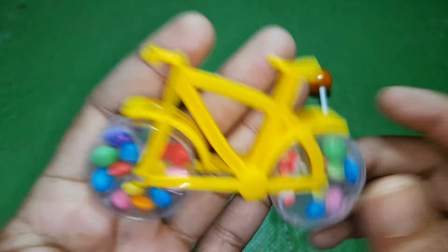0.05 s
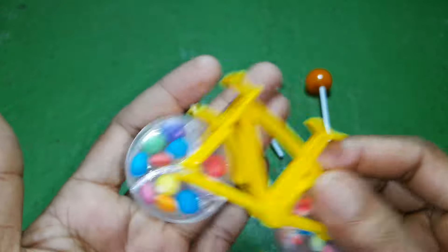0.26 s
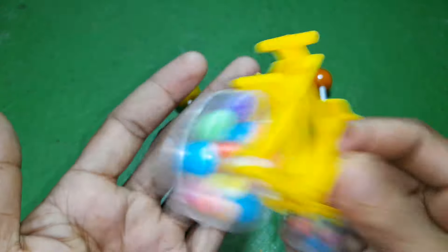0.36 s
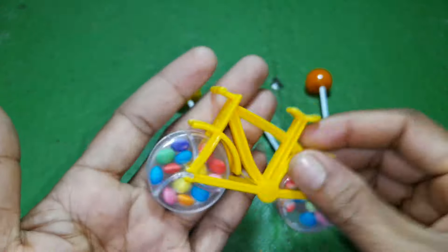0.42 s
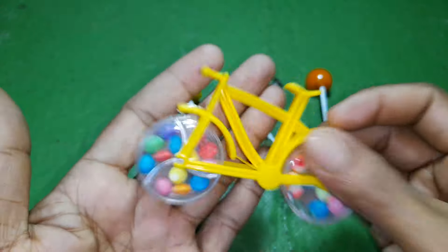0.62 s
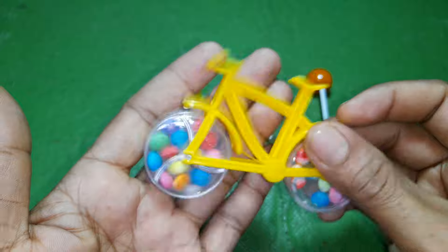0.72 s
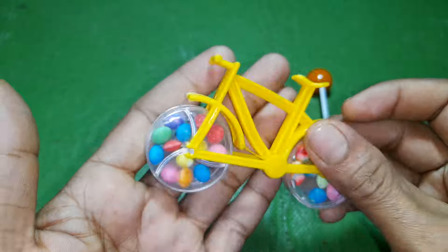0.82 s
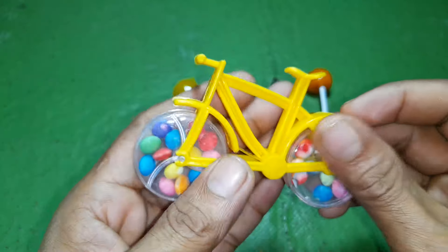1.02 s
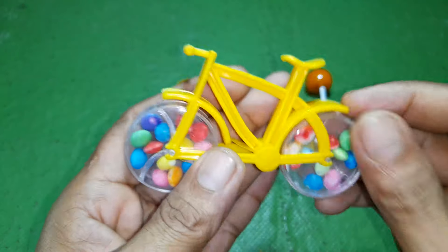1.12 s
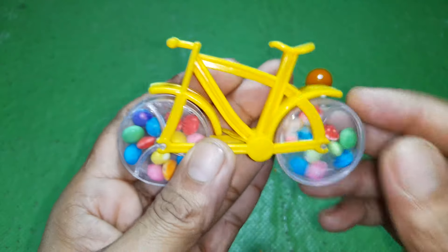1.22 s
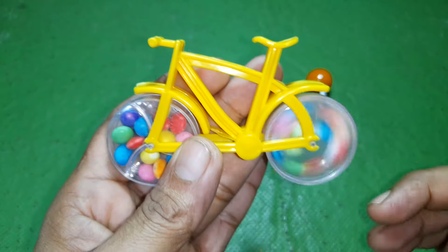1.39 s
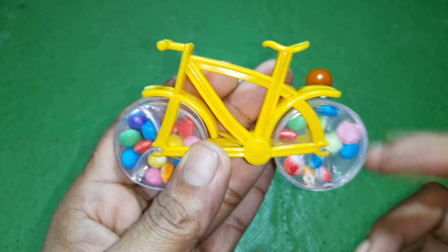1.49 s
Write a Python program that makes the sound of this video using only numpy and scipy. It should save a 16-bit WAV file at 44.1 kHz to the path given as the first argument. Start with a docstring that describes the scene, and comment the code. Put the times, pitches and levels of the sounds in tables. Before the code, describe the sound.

Hard candies rattle in a toy's plastic wheels in quick bursts of bright clicks.

```python
"""Bursts of bright clicks: hard candies rattle in the plastic wheels of a toy bicycle, shaken close by.
Each shake throws the candies against the wheel wall and each other, and they tumble back.
The wheel knocks and the candies ping. Two hard shakes thump the left microphone, and at the end
a finger flicks a wheel. The small room adds a short echo, and a low hum lies underneath."""
import sys
import numpy as np
from scipy import signal
from scipy.fft import rfft, irfft
from scipy.io import wavfile
from scipy.ndimage import uniform_filter1d

SR = 44100
rng = np.random.default_rng(int(sys.argv[2]) if len(sys.argv) > 2 else 0)


def store_wav(level_fs):
    """Save 16-bit WAV to argv[1]."""
    pcm = np.round(np.clip(np.atleast_2d(level_fs), -1, 1) * 32767)
    wavfile.write(sys.argv[1], SR, pcm.T.astype(np.int16))


N = 68355

# Hits, mostly candies; the dull tick near 1.09 s comes from handling the toy: (time [s], wheel knock [dB],
# candy ping [dB], chatter length [s])
HITS = [(0.1907, -22, -16, 0.001), (0.204, -20, -35, 0.0036), (0.2227, -2.5, -13, 0.0023),
        (0.226, -17, -11, 0.00018), (0.2274, -0.5, -6.5, 0.00028), (0.2361, -6.5, -22, 0.001),
        (0.2417, -5.5, -25, 0.0003), (0.2443, -11, -20, 0.00034), (0.2729, -3.5, -26, 0.00071),
        (0.28, -14.5, -33, 0.00035), (0.3999, -3.5, 2.5, 0.0012), (0.402, -2, 8.5, 0.0012),
        (0.4072, -9, 2.5, 0.00061), (0.4093, 0, 8.5, 0.0018), (0.4127, -8.5, 0.5, 0.0009),
        (0.416, 3, 5, 0.00073), (0.421, -8, -11.5, 0.0022), (0.4643, 11, 4, 0.00062),
        (0.4659, 6, -3, 0.0014), (0.476, -9.5, -1.5, 0.0025), (0.4887, -5, -9, 0.0015),
        (0.4926, 2.5, -4, 0.0025), (0.4987, -8.5, -7, 0.0019), (0.503, -5, -5, 0.0014),
        (0.5808, -8.5, -9, 0.0013), (0.5849, -14.5, -1.5, 0.0025), (0.588, -6.5, -2.5, 0.00046),
        (0.59, -5.5, 11, 0.00056), (0.593, 2, -0.5, 0.00062), (0.5973, -1.5, -4, 0.00028),
        (0.6026, -8.5, -15, 0.0024), (0.6153, -14.5, -19, 0.00037), (0.6287, -14.5, -16.5, 0.00096),
        (0.6428, -14, -9.5, 0.0006), (0.6495, 8, -6.5, 0.0005), (0.6507, 8, -9.5, 0.00047),
        (0.6519, 1, -0.5, 0.0027), (0.6602, -10, -1.5, 0.0015), (0.6665, -5, -2, 0.0015),
        (0.683, -7, -13, 0.0024), (0.7017, -14, -2, 0.0005), (0.715, -13, -12.5, 0.0025),
        (0.721, -14, -13.5, 0.001), (0.7295, -12.5, -2, 0.0015), (0.734, 0, -2, 0.0034),
        (0.737, -7, -5.5, 0.0016), (0.7404, -11.5, -6.5, 0.00075), (0.744, -23.5, -8, 0.002),
        (0.782, -1.5, -7, 0.0014), (0.7856, 3.5, -8.5, 0.00054), (0.7867, 9, -6, 0.00027),
        (0.7882, 8, 0, 0.00033), (0.798, -8.5, -10, 0.0017), (0.809, -8.5, -18.5, 0.0004),
        (0.8163, -13.5, -17.5, 0.00075), (0.8357, -3.5, 0, 0.0013), (0.8404, -5, 2, 0.0027),
        (0.8453, -4.5, -13.5, 0.0017), (0.8673, -5.5, -10, 0.0044), (0.872, 6.5, -1.5, 0.00036),
        (0.8737, 9, -4, 0.00063), (0.8756, 5, -1.5, 0.0011), (0.879, -3.5, -3, 0.0015),
        (0.891, -16.5, -5, 0.0011), (0.905, -7.5, -10, 0.001), (1.088, -24.5, -30.5, 0.0033),
        (1.21, -33, -40, 0.0013), (1.3329, -19.5, -26, 0.0015), (1.3361, -14.5, -11, 0.0012),
        (1.3376, -14, -10.5, 0.0018), (1.344, -25, -26.5, 0.0011)]
def clicks():
    """Each hit makes both the wheel and the candy ring."""
    out = np.zeros((2, N))
    for s, knock_db, ping_db, chatter_s in HITS:
        add(out, s, amp(knock_db) * strike(contact(chatter_s), wheel(s)))
        add(out, s, amp(ping_db) * strike(contact(chatter_s), candy()))
    return out


# Tone of the wheel's knock: (pitch [Hz], level [dB])
KNOCK_TONE = [(30, -32.5), (300, -28), (900, -24), (1700, -11.5), (2400, -10.5), (3000, -10), (3700, -5.5),
              (4500, -1.5), (5150, -1), (5900, -1), (6500, -10), (8000, -13), (10200, -30.5),
              (12000, -26.5), (14200, -16.5), (16000, -28)]
# Notes that ring on in the wheel: (pitch [Hz], level [dB], time to fade 60 dB [s])
WHEEL_NOTES = [(2300, -14, .04), (3500, -10, .04), (3870, -2.5, 0.074), (4134, -5.5, 0.0603),
               (4420, -4.5, 0.046), (4755, -4.5, .04), (5310, -5, .03), (5233, -7, .04), (5670, -2, .05)]
# Tone changes: (start [s], main pitch [Hz], its boost [dB], upper boost [dB], clack [dB], snap [dB])
SHAKE_TONES = [(.18, 4640, -5, 1, -1, -10), (.22, 4820, 3, -4.5, -1.5, -2),
               (.39, 4040, 11.5, 2.5, 1.5, -7.5), (.455, 4610, 10.5, 11, 4, 6.5), (.47, 4900, 4, 0, 3, 1.5),
               (.575, 3180, 6, -0.5, 0, 2), (.64, 4850, 6, -0.5, -1.5, -4), (.725, 4100, 9.5, 5, 4.5, 12),
               (.775, 5270, 8, -4.5, -7.5, -1.5), (.825, 4125, 5.5, 4, 6.5, 6.5),
               (.865, 5140, 10, -3.5, 1.5, 2.5), (1.05, 2920, 3, 0.5, 11, -6.5),
               (1.32, 3520, 3, -1, 10.5, -9.5)]
def wheel(s):
    """The plastic knocks; its tone changes with where the candies land and how it is held."""
    shake = max(sum(row[0] <= s for row in SHAKE_TONES) - 1, 0)
    _, main_hz, main_db, upper_db, clack_db, snap_db = SHAKE_TONES[shake]
    def boost(hz):
        return (main_db * hill(hz, main_hz, 307) + upper_db * hill(hz, 5750, 440)
                + clack_db * hill(hz, 1996, 2300) + snap_db * hill(hz, 13460, 4080))
    return crack_and_ring(KNOCK_TONE, WHEEL_NOTES, ring_db=-16, boost=boost)


# Tone of a candy's ping: (pitch [Hz], level [dB])
PING_TONE = [(30, -48.5), (2000, -43.5), (5500, -24.5), (6300, -10), (6650, -1.5), (7080, 3.5), (7500, -6),
             (8000, -13), (8600, -15.5), (10000, -33.5), (11800, -25.5), (15000, -28.5)]
# Notes that ring on in a candy: (pitch [Hz], level [dB], time to fade 60 dB [s])
CANDY_NOTES = [(6440, -4, 0.045), (6870, 0, 0.026), (7320, -9, .04), (8260, -13.5, 0.046)]
def candy():
    """A hard candy pings, each a little different in pitch."""
    tuning = 1 + 0.02 * rng.uniform(-0.47, 1)
    return crack_and_ring([(hz * tuning, db) for hz, db in PING_TONE], CANDY_NOTES, ring_db=-15.5)


def crack_and_ring(tone, notes, ring_db, boost=lambda hz: 0, size=4096):
    """A struck object gives a short crack and ringing notes, never quite the same twice."""
    t = np.arange(size) / SR
    ring = 0
    for hz, db, fade_s in notes:
        level = amp(db + boost(hz) - 60 * t / fade_s) * rng.random()
        pitch = hz * (1 + .012 * rng.uniform(-1, 1))
        ring += level * np.sin(2 * np.pi * (pitch * t + rng.random()))
    crack = unit(tone_filter(tone, lambda hz: boost(hz) + landing_spot(hz)))
    return np.pad(crack, (0, size))[:size] + amp(ring_db) * unit(ring)


def landing_spot(hz, spread_db=2.5, step_hz=700):
    """Where a candy lands makes some pitches louder and others softer, at random."""
    return spread_db * np.interp(hz / step_hz, np.arange(64), rng.standard_normal(64))


def contact(chatter_s, grit_s=0.00057, chatter_db=3):
    """The force of one hit is a gritty touch plus a brief chatter; gives two random patterns."""
    t = np.arange(SR // 100) / SR
    forces = []
    for grit, chatter in zip(*rng.standard_normal((2, 2, len(t)))):
        grit = unit(np.sign(grit) * np.exp(-t / grit_s))
        chatter = unit(chatter * abs(chatter) * np.exp(-(t / chatter_s) ** 2))
        forces.append(even_out(grit + amp(chatter_db) * chatter))
    return forces


def even_out(force, smooth_hz=170):
    """A hard hit stirs all pitches about equally, so broad dips in its tone are filled in."""
    spectrum = rfft(np.pad(force, (32, 991)))
    step_hz = SR / (2 * len(spectrum) - 2)
    power = uniform_filter1d(abs(spectrum) ** 2, int(smooth_hz / step_hz))
    return irfft(spectrum / (abs(power) + .01 * power.mean()) ** .4)[32:][:len(force)]


def strike(forces, response, own_share=0.34):
    """Two force patterns ring an object: the left side hears one, the right a blend of both."""
    left, own = (unit(signal.fftconvolve(force, response)) for force in forces)
    return np.array([left, np.sqrt(1 - own_share) * left + np.sqrt(own_share) * own])


# Loose candies falling back: (start [s], length [s], level [dB])
FALLS = [(0.211, 0.04, -43.5), (0.27, 0.014, -44.5), (0.401, 0.022, -31.5), (0.456, 0.0026, -38.5),
         (0.466, 0.044, -32), (0.508, 0.068, -44), (0.579, 0.019, -39.5), (0.602, 0.035, -44),
         (0.656, 0.057, -38.5), (0.676, .019, -38.5), (0.727, 0.015, -32), (.778, 0.012, -32),
         (0.783, 0.017, -35.5), (0.83, 0.034, -35.5), (0.87, 0.026, -31.5), (0.898, 0.041, -49),
         (1.339, 0.019, -48.5), (1.389, .004, -57)]
def tumbles(taps_per_s=1100, fade_db=-6.5, ping_db=-3):
    """Many tiny random taps die away as the candies settle."""
    out, t = np.zeros((2, N)), np.arange(SR // 10) / SR
    shape = (2, len(t))
    for s, length, db in FALLS:
        for response, part_db in ((wheel(s), 0), (candy(), ping_db)):
            taps = rng.random(shape) < taps_per_s / SR
            forces = taps * rng.choice([-1, 1], shape) * rng.uniform(.5, 1, shape)
            forces *= amp(fade_db * t / length) * (t < length)
            add(out, s, amp(db + part_db) * np.sqrt(length * SR) * strike(forces, response))
    return out


# Jolts: (time [s], level [dB], push or pull [+1/-1], push width [s], swing against push [dB])
JOLTS = [(.465, -3.5, 1, 0.00033, -10.5), (0.652, -8.5, -1, 0.00024, -11.5)]
def thumps(swing_hz=45, extra_hz=65.7, settle_s=0.0081, bump_hz=200, bump_db=-17.5):
    """A jolt gives the left microphone a sharp push, a short bump and a low swing that slows and dies."""
    out, t = np.zeros((2, N)), np.arange(N) / SR
    for s, db, sign, push_s, swing_db in JOLTS:
        age = np.maximum(t - s, 0)
        turns = swing_hz * age + extra_hz * settle_s * (1 - np.exp(-age / settle_s))
        swing = np.sin(2 * np.pi * turns) * np.exp(-(age / 0.023) ** 2)
        bump = np.sin(2 * np.pi * bump_hz * age) * np.exp(-age / 0.0056)
        push = np.exp(-abs((t - s) / push_s) ** 0.67)
        out[0] += sign * amp(db) * (push - amp(swing_db) * swing - amp(bump_db) * bump)
    return out


# What the right microphone hears: (pitch [Hz], level against the left [dB])
RIGHT_SHADE = [(100, -9.5), (1200, -6.5), (2200, -4), (3500, -9), (4800, -12.5), (5800, -15), (7100, -29),
               (8300, -26), (10200, -10.5), (12000, -4.5), (14500, -6), (16000, -12)]
def far_microphone(x, delay_s=.0002):
    """The toy is near the left microphone, so the right one hears it later and shaded."""
    delayed = np.pad(x, (round(delay_s * SR), 0))
    return signal.fftconvolve(delayed, tone_filter(RIGHT_SHADE))[:N]


# How long the room rings: (pitch [Hz], time to fade 60 dB [s])
ROOM_FADE = [(200, .35), (1500, 0.29), (4500, 0.23), (7500, 0.23), (14000, 0.19)]
# Tone of the echoes: (pitch [Hz], level [dB])
ECHO_TONE = [(300, -2), (1500, 1), (4500, 1), (7200, -1), (10000, 6.5), (14500, 1)]
def room(x, early_db, tail_db):
    """Sound bounces off hands and table first, then dies away in the room."""
    t = np.arange(SR // 2) / SR
    early = rng.standard_normal(len(t)) * (rng.random(len(t)) < .1) * np.exp(-t / 0.0087) * (t > .001)
    hz, age, noise = signal.stft(rng.standard_normal(len(t)) * (t > .006), SR, nperseg=256)
    fade = amp(-60 * age / look_up(ROOM_FADE, hz)[:, None])
    tail = signal.istft(noise * fade, SR, nperseg=256)[1][:len(t)]
    echoes = amp(early_db) * unit(early) + amp(tail_db) * unit(tail)
    echoes = signal.fftconvolve(echoes, tone_filter(ECHO_TONE))
    return x + signal.fftconvolve(x, echoes)[:N]


# Tone of the room noise: (pitch [Hz], relative level [dB])
AIR_TONE = [(20, -23), (60, -12.5), (115, 0), (165, -11), (225, -3), (300, -6), (440, -7), (680, -12.5),
            (1000, -15), (2000, -24.5), (3000, -29.5), (4200, -40.5), (7500, -43), (8900, -51.5),
            (16000, -61.5)]
# How alike its two sides are: (pitch [Hz], likeness [0 to 1])
AIR_LIKENESS = [(60, 0.93), (200, 0.91), (550, 0.54), (1500, 0), (15000, 0.072)]
# How it leans to one side: (pitch [Hz], left over right [dB])
AIR_LEAN = [(60, 3), (600, -1.5), (1700, -1.5), (4500, 4), (7200, 20.5), (10000, 0.5), (15000, 2)]
# Hum notes: (pitch [Hz], relative level [dB])
HUM_NOTES = [(115, -13), (305, -8.5), (450, -15)]
# Volume of noise and hum together: (time [s], level [dB])
BACKGROUND_LEVEL = [(0, -46.5), (.15, -44), (.33, -44), (.45, -47.5), (.57, -51), (.8, -52), (1.09, -55),
                    (1.55, -54.5)]
def background(hum_width_hz=5.12):
    """Low room noise and a wavering hum, which sink soon after the rattling starts."""
    hz = np.fft.rfftfreq(N, 1 / SR)
    shared, own, hum_noise = rfft(rng.standard_normal((3, N)))
    likeness, lean = look_up(AIR_LIKENESS, hz), amp(look_up(AIR_LEAN, hz) / 2)
    right = likeness * shared + np.sqrt(1 - likeness ** 2) * own
    air = irfft(np.array([shared * lean, right / lean]) * amp(look_up(AIR_TONE, hz)), N)
    hum = sum(amp(db) * unit(irfft(hum_noise * hill(hz, f, hum_width_hz), N)) for f, db in HUM_NOTES)
    level = amp(np.interp(np.arange(N) / SR, *np.transpose(BACKGROUND_LEVEL)))
    return (np.sqrt(2) * unit(air) + hum) * np.sqrt(N) * level


def amp(db):
    """Turns decibels into a multiplier."""
    return 10 ** (np.asarray(db) / 20)


def unit(x):
    """Scales a sound to energy 1."""
    return x / np.sqrt(np.sum(x ** 2) + 1e-20)


def hill(hz, centre_hz, width_hz):
    """A smooth hill of height 1."""
    return np.exp(-((hz - centre_hz) / width_hz) ** 2)


def look_up(table, hz):
    """Reads between a table's rows on a musical (log) pitch scale."""
    pitches, values = np.transpose(table)
    return np.interp(np.log(hz + 1), np.log(pitches + 1), values)


def add(mix, s, sound):
    """Mixes a stereo sound in at s seconds."""
    part = mix[:, max(round(s * SR), 0):][:, :sound.shape[1]]
    part += sound[:, :part.shape[1]]


def tone_filter(tone, boost=lambda hz: 0, size=2048):
    """A sharp click with the given tone plus a boost in dB; it also works as a filter."""
    hz = abs(np.fft.fftfreq(size, 1 / SR))
    log_gain = np.log(amp(look_up(tone, hz) + boost(hz)))
    return np.fft.ifft(np.exp(np.conj(signal.hilbert(log_gain)))).real[:size // 2]


def scene():
    """The rattle in its room, with the thumps and the background."""
    left, right = clicks() + tumbles()
    left = room(left, early_db=-13, tail_db=-19)
    right = room(far_microphone(right), early_db=-5.5, tail_db=-13)
    return np.array([left, right]) + thumps() + background()


def record(dry):
    """Clips peaks that are too loud and cuts the highest treble."""
    low_pass = signal.firwin(255, cutoff=15900, window=("kaiser", 9), fs=SR)
    return signal.oaconvolve(np.clip(dry, -1, 1), low_pass[None], "same")


dry = scene()
out = record(dry)
store_wav(out)
```